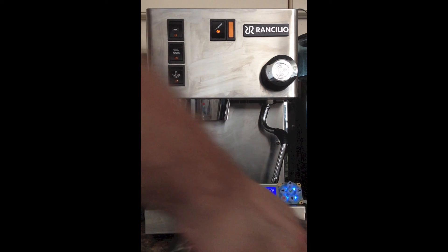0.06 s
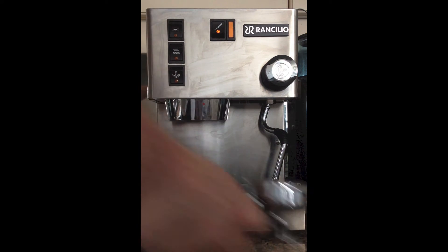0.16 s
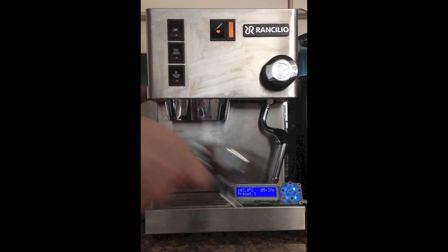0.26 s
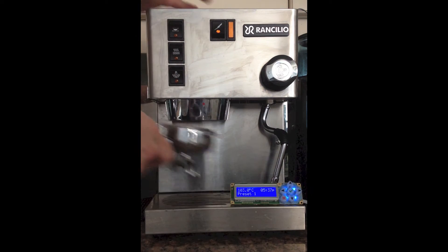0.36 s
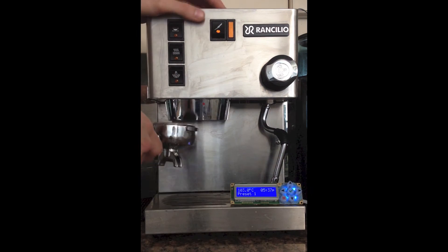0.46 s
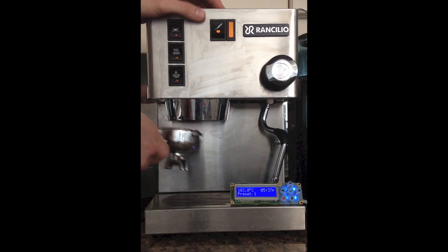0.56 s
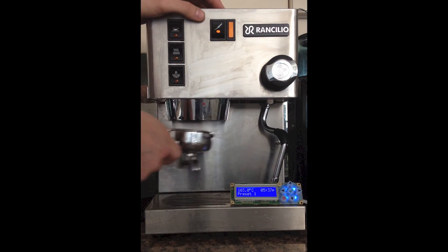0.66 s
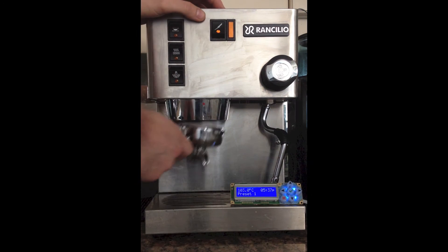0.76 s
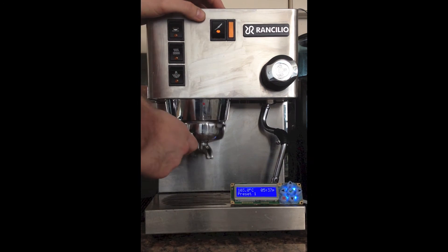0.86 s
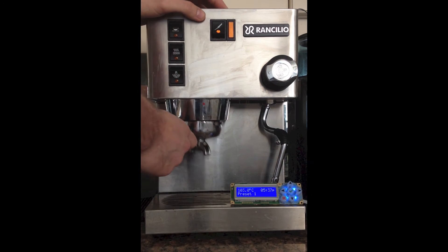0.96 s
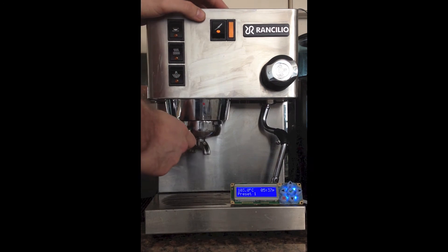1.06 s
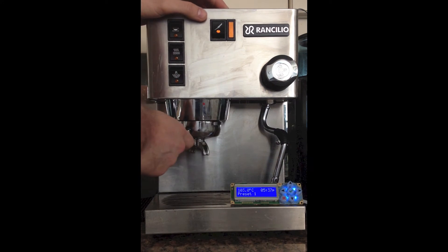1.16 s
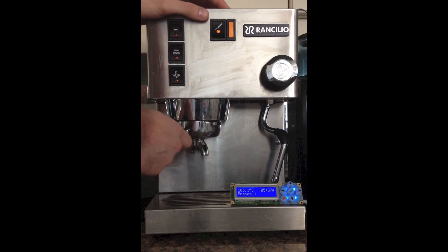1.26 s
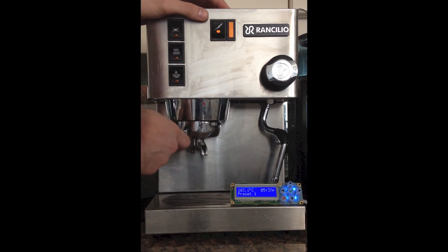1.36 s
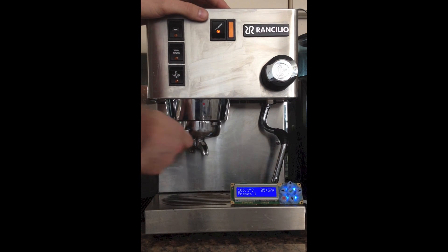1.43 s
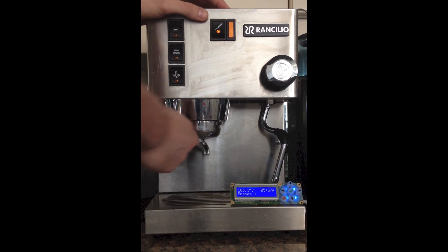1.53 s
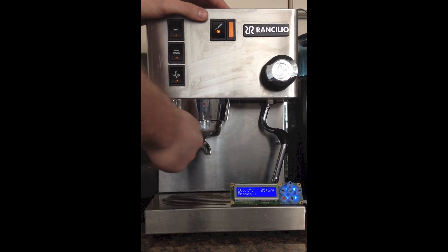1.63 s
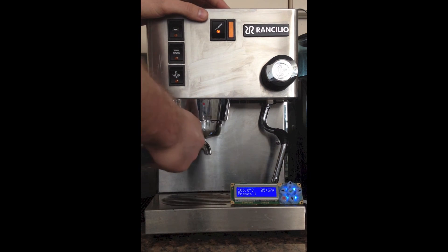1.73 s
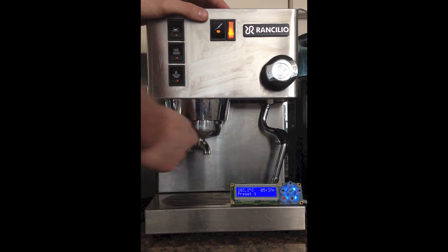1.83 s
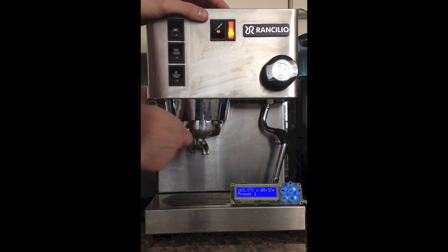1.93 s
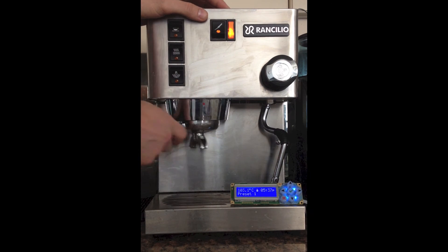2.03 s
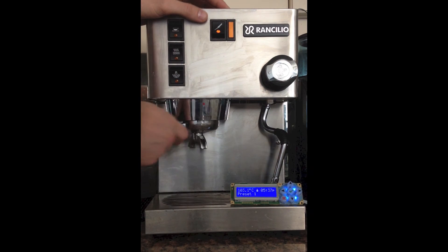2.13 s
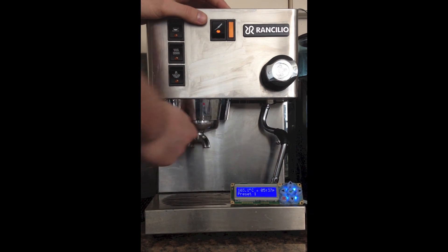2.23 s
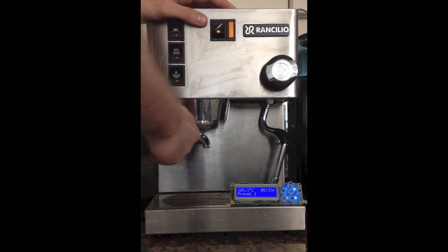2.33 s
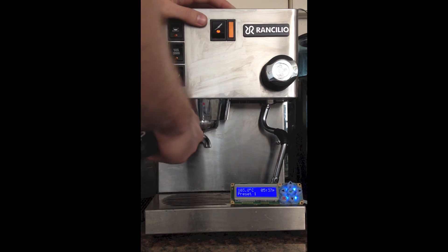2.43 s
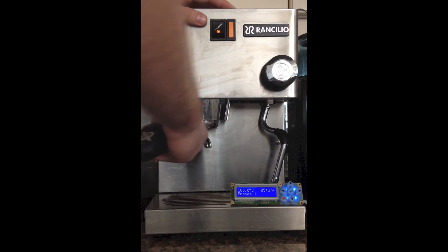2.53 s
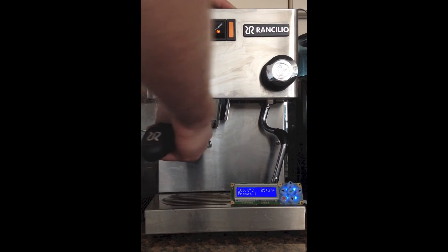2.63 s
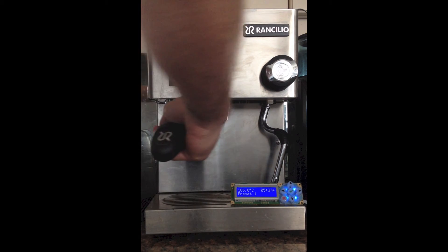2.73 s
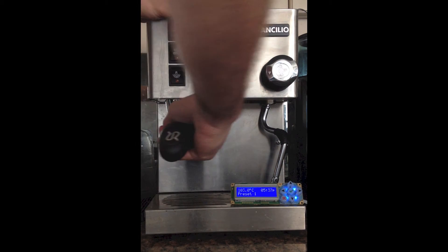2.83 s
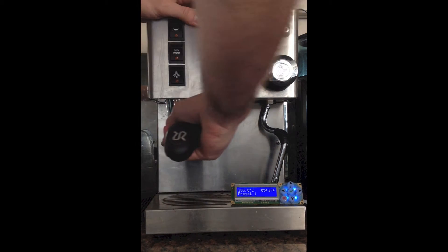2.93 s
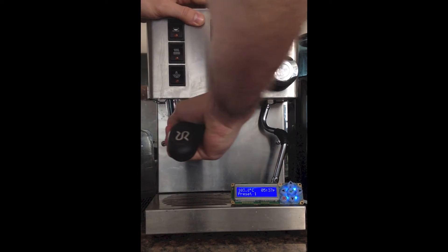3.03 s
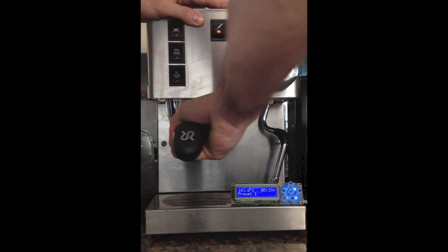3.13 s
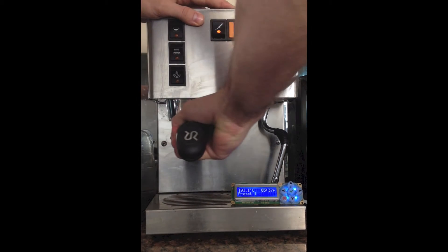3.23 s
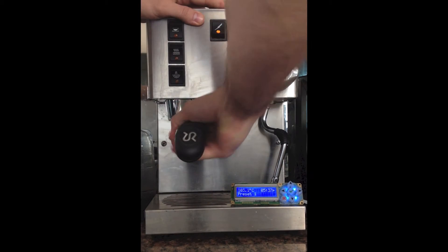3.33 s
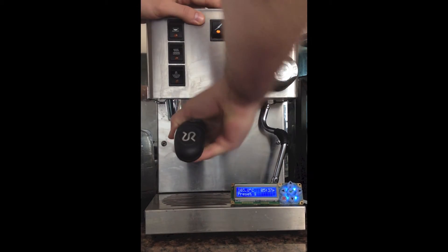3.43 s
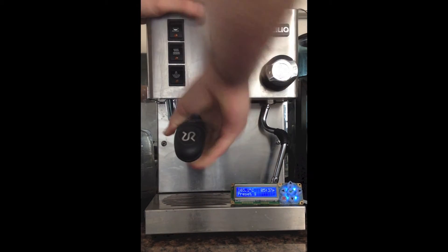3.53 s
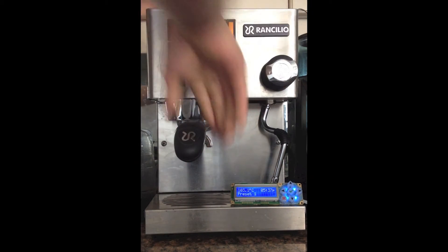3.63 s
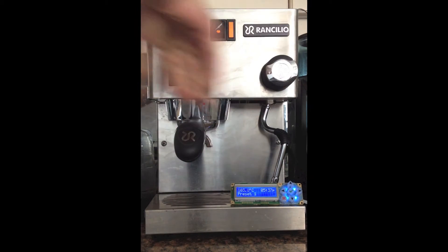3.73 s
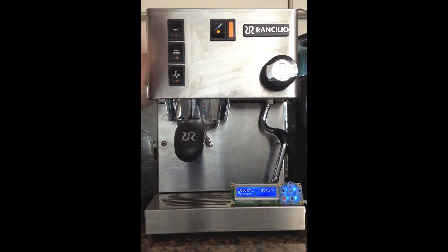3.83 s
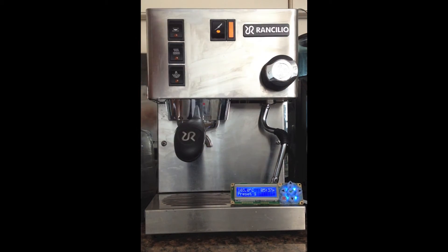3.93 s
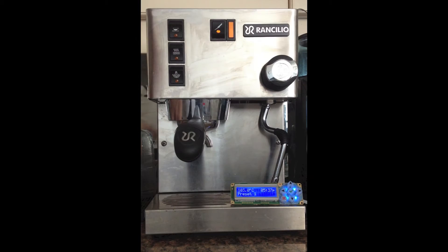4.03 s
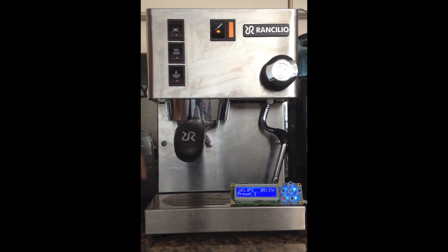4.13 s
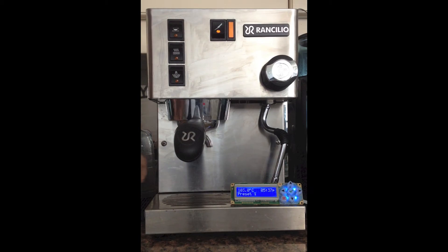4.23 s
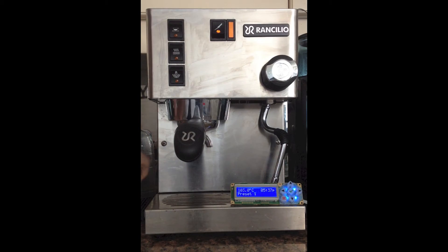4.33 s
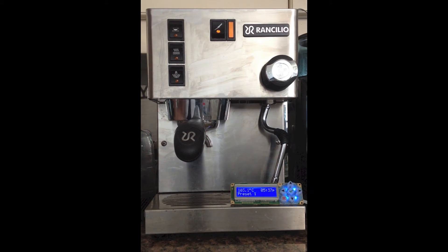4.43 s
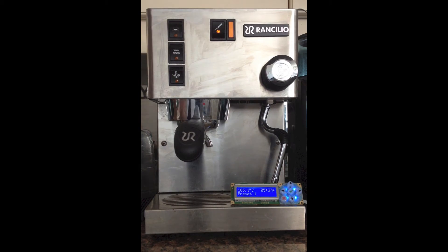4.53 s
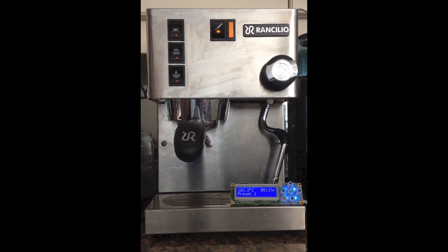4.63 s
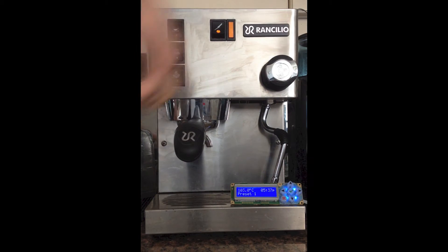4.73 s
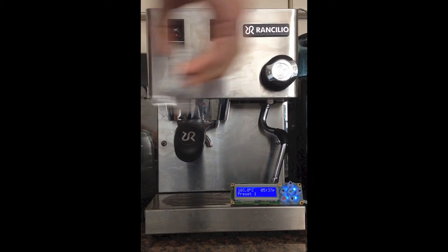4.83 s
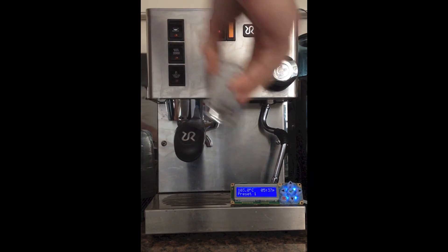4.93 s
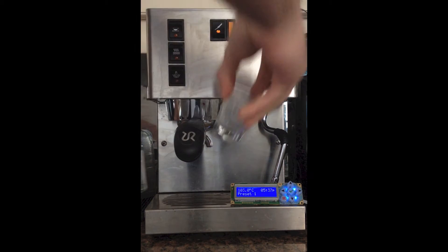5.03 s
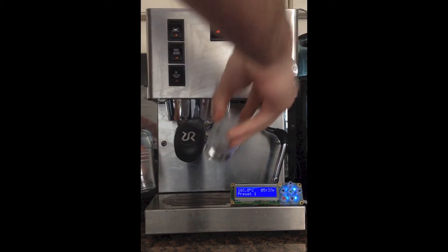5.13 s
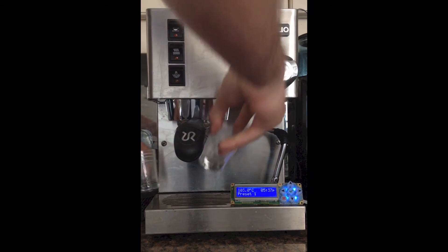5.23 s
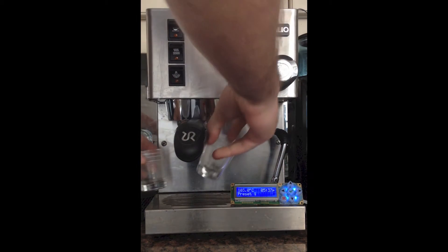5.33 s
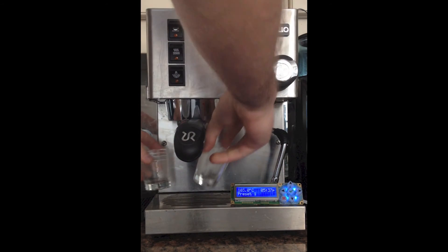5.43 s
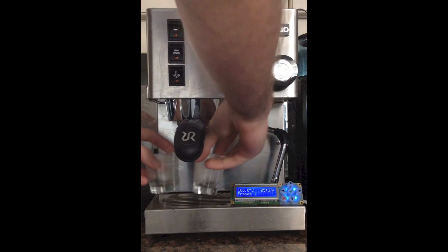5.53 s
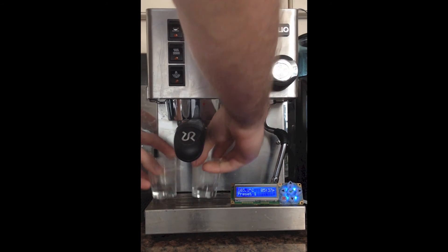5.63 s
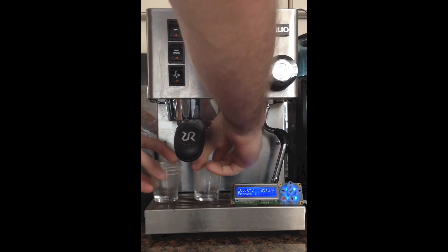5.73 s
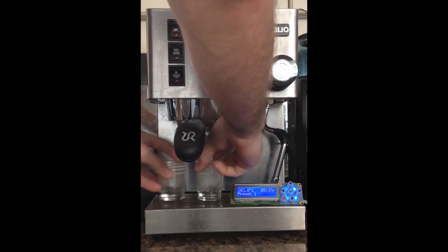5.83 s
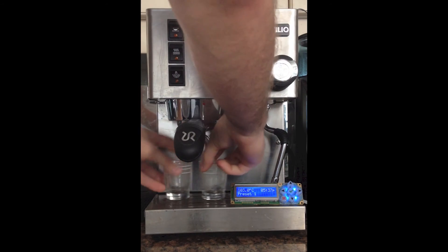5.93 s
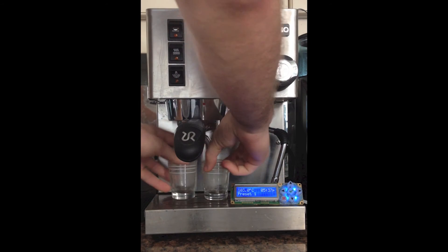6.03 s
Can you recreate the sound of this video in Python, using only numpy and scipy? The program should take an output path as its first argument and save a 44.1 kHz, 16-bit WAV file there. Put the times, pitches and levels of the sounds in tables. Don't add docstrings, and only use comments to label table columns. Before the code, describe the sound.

A metal portafilter knocks, scrapes and twists hard into an espresso machine, then shot glasses clink onto a steel drip tray in a quiet kitchen.

```python
import sys
import numpy as np
from scipy import signal
from scipy.fft import rfft, irfft, next_fast_len
from scipy.io import wavfile
from scipy.ndimage import uniform_filter1d

SR = 44100
rng = np.random.default_rng(int(sys.argv[2]) if len(sys.argv) > 2 else 0)


def int16_out(signal):
    q = np.round(np.clip(np.atleast_2d(signal).T, -1, 1) * 32767)
    wavfile.write(sys.argv[1], SR, q.astype(np.int16))


def nominal_scale(level):
    x = np.asarray(level, float) / 20
    return 10 ** x


N = 268216


def rms_one(x):
    return x / np.sqrt(np.mean(x ** 2) + 1e-20)


def at_hz(points, hz):
    table_hz, values = np.array(points).T
    return np.interp(np.log(hz), np.log(table_hz), values)


def band(x, low_hz, high_hz):
    return signal.sosfilt(signal.butter(2, [low_hz, high_hz], "band", fs=SR, output="sos"), x)


def lowpass(x, hz):
    return signal.sosfilt(signal.butter(2, hz, fs=SR, output="sos"), x)


def highpass(x, hz, order):
    return signal.sosfilt(signal.butter(order, hz, "high", fs=SR, output="sos"), x)


def ring(force, hz, t60_s):
    radius, w = nominal_scale(-60 / (t60_s * SR)), 2 * np.pi * hz / SR
    return signal.lfilter([0, np.sin(w)], [1, -2 * radius * np.cos(w), radius ** 2], force + 1e-18)


def click(s, db):
    x = np.zeros(N)
    x[round(s * SR)] = nominal_scale(db)
    return x


def contacts(blows, slides, edges_hz, grain_db, contact_ms, sizzle_db, sizzle_follows):
    t, shape = np.arange(N) / SR, np.zeros((4, N))
    age_s = t[:4000]
    rise_s = np.array([[.003], [.0015], [.0006], [.0003]])
    pulse = (1 - np.exp(-age_s / rise_s)) * np.exp(-age_s * 1000 / contact_ms)
    for s, db, weight_db, hard_db, *muffle_db in blows:
        i = round(s * SR)
        top_db = sizzle_db + sizzle_follows * hard_db - sum(muffle_db)
        colour_db = np.array([weight_db, 0, hard_db, top_db])
        shape[:, i:i + 4000] += (nominal_scale(db + colour_db)[:, None] * pulse)[:, :N - i]

    grains = nominal_scale(grain_db * np.minimum(rng.exponential(1, N // 60 + 1), 2.5))
    grit = rms_one(uniform_filter1d(grains.repeat(60)[:N], size=40))
    for s, length_s, db, bright_db in slides:
        gone = (t - s) / length_s
        off_peak = np.interp(gone, [0, .17, 1], [1, 0, 1], 3, 3)
        tilt_db = bright_db * np.array([[-.4], [0], [1], [2]])
        shape += grit * nominal_scale(db - 14.5 * off_peak ** 2 + tilt_db)

    noise = signal.lfilter([1], [1, -.6], rng.standard_normal((4, N)))
    force = np.zeros(N)
    for gain, white, low, high in zip(shape, noise, edges_hz, edges_hz[1:]):
        force += gain * rms_one(band(white, low, high))
    return force


def struck(force, modes, ring_db, tilt_db, crack_db):
    rings = np.zeros(N)
    for hz, db, t60_s in modes:
        rings += nominal_scale(db + tilt_db * np.log2(hz / 1000)) * ring(force, hz, min(t60_s, .9))
    return nominal_scale(crack_db) * force + nominal_scale(ring_db) * rings


def coloured(spectrum, modes):
    size = next_fast_len(N)
    hz = np.maximum(np.arange(size // 2 + 1) * SR / size, 10)
    peaks = sum(nominal_scale(db) / (1 + ((hz - f) / width) ** 2) for f, width, db in modes)
    white = rfft(rng.standard_normal(size))
    return rms_one(irfft(white * nominal_scale(at_hz(spectrum, hz)) * (1 + peaks), size)[:N])


# frequency in Hz, level in dB per Hz.
VENTILATION = [(15, -79), (25, -41), (43, -62), (64, -23), (102, -14.5), (127, -7), (151, 0), (266, -5.5),
               (327, -15), (356, -6.5), (388, -10), (637, -16), (1500, -29), (1950, -58), (3300, -120)]
# frequency in Hz, width in Hz, level in dB.
ROOM_MODES = [(160.6, 22, -4), (227, 8.1, -9.5), (271, 31, -2.5), (358, 2.6, -11.5)]
# frequency in Hz, level in dB per Hz.
MIC_HISS = [(1100, -32.5), (1500, -6), (1900, -0.5), (2700, -3.5), (4500, -5.5), (7000, -10.5),
            (10200, -11), (12500, -9), (15500, -13.5), (20000, -16)]


def air():
    return nominal_scale(-54) * coloured(VENTILATION, ROOM_MODES) + nominal_scale(-71.5) * coloured(MIC_HISS, [])


# start in seconds, peak in dB, weight in dB, hardness in dB.
LIFT_BLOWS = [
    (.001, -27.5, -10.1, -23.5),
]
# frequency in Hz, level in dB, t60 in seconds.
STAND_MODES = [(521, -9, 0.29), (680, 4.5, 0.066), (710, 1, 0.035), (865, -8.5, 0.029), (1077, -14, 0.047),
               (1190, -17, 0.039), (1466, -13, 0.023), (1900, -22, 0.029), (4700, -40, .03),
               (5060, -25, .03), (5200, -16, 0.012), (5600, -14.5, 0.014), (7300, -24, 0.025),
               (7600, -17.5, 0.025), (11300, -26, 0.036), (14500, -28, .03)]
METAL_EDGES_HZ = [150, 600, 1500, 5000, 15500]


def lift():
    force = contacts(LIFT_BLOWS, [], METAL_EDGES_HZ,
                     grain_db=0, contact_ms=10.8, sizzle_db=8.5, sizzle_follows=0.93)
    modes = [(hz, db, t60_s if hz < 2000 else min(t60_s, .05)) for hz, db, t60_s in STAND_MODES]
    return struck(force, modes, ring_db=-38.0, tilt_db=8.5, crack_db=-14.5)


# start in seconds, peak in dB, frequency in Hz, t60 in seconds.
THUMPS = [
    (.002, -54, 45, 0.078),
    (.838, -66, 40, .15),
    (.978, -74, 38.6, .15),
    (1.608, -70, 35, .12),
    (1.98, -66.5, 40, .15),
    (2.166, -51, 43, 0.15),
    (5.74, -72, 40.3, .12),
]


def rocking():
    return sum(ring(click(s, db), hz, t60_s) for s, db, hz, t60_s in THUMPS)


# start in seconds, peak in dB, weight in dB, hardness in dB, gasket muffling in dB.
HANDLE_BLOWS = [(0.819, -27, -5, 0, -2.1), (0.84, -18.5, -3.5, -2.5, 6.5), (0.906, -21, -26, -13, 5),
                (0.915, -21, -10.1, -23, -0.5), (0.977, -12.5, 2, -4, 3.2), (0.985, -15.5, -2.5, -14.5, -9),
                (1.017, -23, 2, -24, -3), (1.464, -52, -11, -10, 5), (1.607, -26, 1.5, -8.5, 5),
                (1.972, -37, 8, -16, 4), (1.979, -12.5, -11, -7.5, 9), (1.996, -14.5, -8, -9.5, 7),
                (2.007, -10, -11.5, -10.1, -1.8), (2.015, -13.5, -4.2, -4, 5.5),
                (2.049, -16.5, -2.2, -6, 7), (2.104, -25.5, 1, -8.5, -3), (2.165, -14, -3.2, -7.5, 6),
                (2.174, -23.5, 0.7, -16, 3), (2.183, -16, -11, -13.5, -3), (3.309, -34.5, 6, -0.5, 9.5)]
# start in seconds, length in seconds, peak in dB, brightness in dB.
HANDLE_SLIDES = [
    (.3, 0.25, -72.5, 0.5),
    (0.844, 0.25, -46.5, -5),
    (1.03, 0.34, -52.5, -5),
    (1.472, 0.25, -63.5, -19),
    (1.757, .23, -54.5, -9),
    (2.2, .2, -54.5, -1.5),
    (2.348, 0.36, -60, -7),
    (3.312, 0.12, -55.5, -1.5),
    (3.397, 0.051, -62.5, 2),
    (3.499, 0.19, -65.5, .1),
]
# frequency in Hz, level in dB, t60 in seconds.
CASING_MODES = [(226, -18, 0.17), (313, -12.5, .18), (384, -26.5, 0.81), (426, -12, 0.48), (478, 9, 0.046),
                (591, 4, 0.099), (653, 5, 0.031), (814, -1.5, 0.107), (919, -4, 0.12), (1086, -6.5, 0.18),
                (1126, -2.5, 0.1), (1341, -25, 0.23), (1570, -3, 0.08), (1860, -37, 0.31),
                (2103, -9.5, 0.16), (2500, -49, 0.0644), (2890, -10.5, 0.079), (3450, -33, .1)]
# frequency in Hz, level in dB, t60 in seconds.
BASKET_MODES = [(4500, -20, 0.072), (5650, -38, 0.18), (6500, -40, .4), (7200, -37, .5), (7300, -41, .45),
                (7760, -35, .45), (8300, -37, 0.37), (8920, -39, .45), (9760, -41, 0.4124),
                (10910, -42, .4), (12300, -44, .4), (13380, -41.5, .35)]


def handle():
    force = contacts(HANDLE_BLOWS + rattle(count=5), HANDLE_SLIDES, METAL_EDGES_HZ,
                     grain_db=3.0, contact_ms=6.37, sizzle_db=-9.5, sizzle_follows=1.0)
    return struck(force, CASING_MODES + BASKET_MODES, ring_db=-51.5, tilt_db=3.0, crack_db=-5.5)


# start in seconds, peak in dB, frequency in Hz, t60 in seconds,
# share of broad click in dB.
TICKS = [(.469, -47, 1340, 0.061, -14), (.47, -55.5, 1750, 0.056, -20), (0.469, -51, 2250, 0.037, -14),
         (3.022, -60.5, 2500, .01, 3), (3.237, -56.5, 2350, 0.02, -2), (3.632, -53.5, 2830, 0.011, 2.5),
         (3.705, -61, 5570, .01, 10.5), (3.90, -65.5, 6140, 0.0098, 9), (3.986, -63.5, 2500, 0.022, 2),
         (4.289, -66, 5580, 0.034, -1), (4.367, -55, 3700, 0.013, -9), (4.821, -61, 1750, 0.029, -12)]


def ticks():
    out, i = np.zeros(N), np.arange(600)
    puff = rng.standard_normal(600) * np.sin(np.pi * i / 600) * np.exp(-i / SR / 0.013)
    for s, db, hz, t60_s, broad_db in TICKS:
        broad = signal.fftconvolve(click(s, db + broad_db - 3), puff)[:N]
        out += ring(click(s, db), hz, t60_s) + band(broad, 1100, 7700)
    return out


# start in seconds, peak in dB,
# frequency in Hz, t60 in seconds.
HANDLE_NOTES = [(.820, -23.5, 874, 0.03), (.828, -33, 301, 0.24), (.842, -19, 482, 0.043),
                (.910, -30, 1552, 0.074), (.912, -29, 2140, .076), (.912, -29, 927, 0.07),
                (0.979, -13.5, 4500, 0.012), (.980, -15, 830, 0.061), (.985, -23, 603, 0.13),
                (.995, -23, 1143, 0.1), (1.012, -30, 426, 0.1), (1.085, -36.5, 412, .12),
                (1.1, -42.5, 367.5, 1), (1.464, -45.5, 864, 0.047), (1.464, -53, 1385, .04),
                (1.608, -39.5, 2243, 0.094), (1.61, -35, 618, 0.076), (1.61, -33.5, 452, .12),
                (1.983, -28, 4240, 0.032), (1.985, -18.5, 1070, 0.07), (1.983, -22, 1860, 0.038),
              (1.99, -20.5, 846, 0.15), (2.011, -11, 827, 0.088), (2.012, -18.5, 456, 0.096),
              (2.046, -13, 393, 0.075), (2.17, -28.5, 1058, 0.13), (2.2, -32, 418, 0.43),
              (2.56, -56, 916, 0.21), (3.311, -32.5, 432, 0.12), (3.311, -40, 870, 0.065),
              (3.311, -53, 1060, .12), (3.312, -28.5, 700, 0.035), (3.308, -37, 1896, 0.083),
              (3.41, -51, 3100, 0.032), (2.17, -29, 2930, 0.063), (2.6, -55, 1400, .04)]
# start in seconds, peak in dB, frequency in Hz, t60 in seconds.
FAR_GLASS_RINGS = [
    (3.388, -52, 1572, 1.2),
    (3.47, -67, 1335, .8),
]
# start in seconds, peak in dB, frequency in Hz, t60 in seconds.
GLASS_NOTES = [
    (5.738, -23, 301, 0.076),
    (5.738, -22.5, 2835, .07),
    (5.739, -33.5, 3450, 0.19),
    (5.75, -34, 568, 0.18),
    (5.79, -43, 468, 0.45),
    (5.891, -51, 2054, 0.2),
    (5.893, -48, 4700, .06),
    (5.945, -54, 2910, .094),
    (5.955, -43.5, 445, 0.14),
    (6.02, -44.5, 303, .2),
]


def notes():
    out, age_s = np.zeros(N), np.arange(SR) / SR
    jitter = rms_one(lowpass(rng.standard_normal((2, N + SR)), 60))
    for row in HANDLE_NOTES + GLASS_NOTES + FAR_GLASS_RINGS:
        s, db, hz, t60_s = row
        i = round(s * SR)
        swell = 1 - np.exp(-age_s / (.00111 + .013 * t60_s))
        size, phase = .45 * (1 - np.exp(-age_s / .02)) * jitter[:, i:i + SR]
        if row in FAR_GLASS_RINGS:
            size, phase = 0, 0
            swell *= np.exp(-np.maximum(s + age_s - 3.61, 0) / .015)
        tone = np.sin(2 * np.pi * hz * age_s + phase)
        note = nominal_scale(db - 60 * age_s / t60_s) * swell * (1 + size) * tone
        out[i:i + SR] += note[:N - i]
    return highpass(out, 200, order=2)


def rattle(count):
    start_s, gap_s, first_db, loss_db = 1.088, .037, -49, 2.5
    weight_db, hard_db, muffle_db = -12, 4., -9
    uneven = rng.uniform(-.35, .35, count) * (np.arange(count) > 0)
    return [(start_s + gap_s * (k + uneven[k]), first_db - loss_db * k, weight_db, hard_db, muffle_db)
            for k in range(count)]


SQUEAK_OVERTONES_DB = [3.7, -1.5, -13, -17, -22, -25, -29]


def squeak():
    start_s, pitch_hz, sag_hz_per_s, grow_ms, drop_ms = 3.312, 2045, 4500., 4, 5.1
    since_s = np.clip(np.arange(N) / SR - start_s, -.05, .05)
    wobble = rms_one(uniform_filter1d(rng.standard_normal(N), size=90))
    turns = np.cumsum((pitch_hz - sag_hz_per_s * since_s) * (1 + .017 * wobble)) / SR
    tone = sum(nominal_scale(db) * np.sin(2 * np.pi * (k + 1) * turns) for k, db in enumerate(SQUEAK_OVERTONES_DB))
    spread_s = np.where(since_s < 0, grow_ms, drop_ms) / 1000
    return tone * nominal_scale(-32) * np.exp(-.5 * (since_s / spread_s) ** 2)


def rub():
    start_s, length_s, pitch_hz, rise_hz_per_s, width_hz = 4.88, 0.37, 1780, 1150., 120
    since_s = np.arange(N) / SR - start_s
    gone = np.clip(since_s / length_s, 0, 1)
    turns = np.cumsum(pitch_hz + rise_hz_per_s * since_s) / SR
    flutter = rms_one(lowpass(rng.standard_normal((2, N)), width_hz))
    whistle = flutter[0] * np.sin(2 * np.pi * turns) + flutter[1] * np.cos(2 * np.pi * turns)
    grip = nominal_scale(4 * rms_one(uniform_filter1d(rng.standard_normal(N), size=1800)))
    return nominal_scale(-75) * grip * whistle * np.sqrt(np.sin(np.pi * gone ** 0.5).clip(0))


# start in seconds, peak in dB, weight in dB, hardness in dB.
GLASS_BLOWS = [
    (5.7342, -25.5, -4, 6.5),
    (5.742, -23.5, -15, 1),
    (5.75, -36, 1, -5),
    (5.889, -53.5, -7, 14),
    (5.966, -55, 16, 6),
    (6.012, -57.5, 8, 9),
    (6.027, -61, 10.1, 6),
]
# start in seconds, length in seconds, peak in dB, brightness in dB.
GLASS_SLIDES = [
    (5.82, 0.23, -59.5, 1.7),
]
# frequency in Hz, level in dB, t60 in seconds.
TRAY_MODES = [(302, 12, 0.17), (587, -15, .05), (1143, -3, 0.086), (1580, -27, .1), (1940, -8.5, 0.12),
              (2164, -24, 0.1), (2500, -22, 0.099), (2900, -18.5, .15), (3446, -19, 0.08),
              (4130, -28, 0.092), (4700, -17, 0.087)]
GLASS_EDGES_HZ = [150, 600, 1700, 3800, 15500]


def glasses():
    force = contacts(GLASS_BLOWS, GLASS_SLIDES, GLASS_EDGES_HZ,
                     grain_db=-2.0, contact_ms=7.25, sizzle_db=-4, sizzle_follows=1.0)
    return struck(force, TRAY_MODES, ring_db=-52, tilt_db=2.5, crack_db=-6.0)


# frequency in Hz, t60 in seconds.
KITCHEN_T60 = [(100, .55), (300, .45), (800, .4), (2000, .36), (5000, .32), (13000, .27)]


def kitchen(x):
    hall_t60_s, hall_db = 0.69, -20.5
    t = np.arange(SR) / SR
    edges_hz = 80 * 2 ** np.arange(0, 8.1, .5)
    echo = np.zeros(SR)
    for low, high in zip(edges_hz, edges_hz[1:]):
        t60_s = at_hz(KITCHEN_T60, np.sqrt(low * high))
        noise = band(rng.standard_normal(SR), low, high)
        dull_db = 5 * max(np.log2(low / 1200), 0)
        tail = noise * (nominal_scale(-60 * t / t60_s) + nominal_scale(hall_db - dull_db - 60 * t / hall_t60_s))
        echo += tail * np.sqrt((high - low) / np.sum(tail ** 2) * 2 / SR)
    echo *= 1 - np.exp(-(t / 0.0061) ** 2)
    return signal.fftconvolve(x, echo)[:N]


def scene():
    near = lift() + handle() + ticks() + squeak() + rub() + glasses()
    near = highpass(near, 190, order=4)
    parts = notes()
    room = nominal_scale(-2.0) * kitchen(near + nominal_scale(-7.5) * parts)
    return (near + parts + room + rocking() + air())[None]


def band_limit(x):
    return signal.sosfilt(signal.butter(12, 16300, fs=SR, output="sos"), x)


# centre in Hz, width in Hz, level in dB.
MIC_DIP = (10830, 5460, -5.5)


def record(dry):
    hz, width_hz, db = MIC_DIP
    notched = dry - (1 - nominal_scale(db)) * band(dry, hz - width_hz / 2, hz + width_hz / 2)
    mix = signal.sosfilt(signal.cheby2(12, 30, 15550, fs=SR, output="sos"), notched)
    return band_limit(mix)


dry = scene()
out = record(dry)
int16_out(out)
```